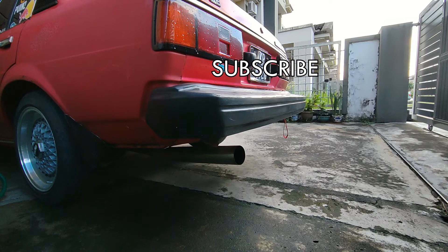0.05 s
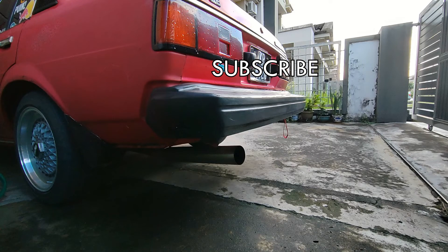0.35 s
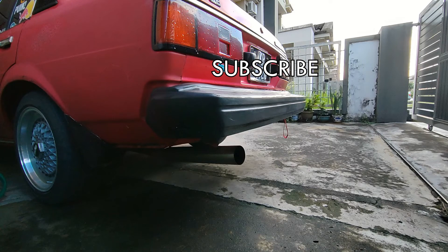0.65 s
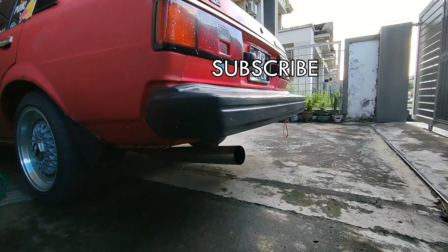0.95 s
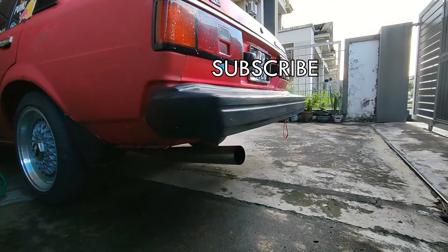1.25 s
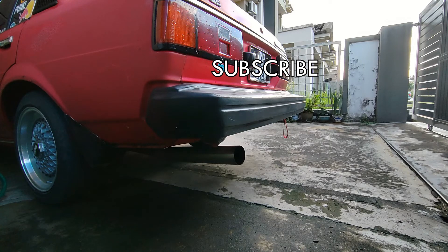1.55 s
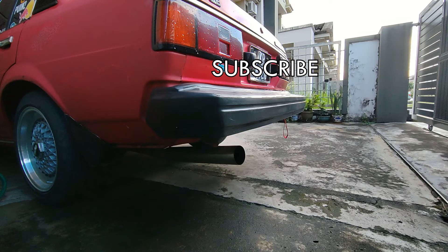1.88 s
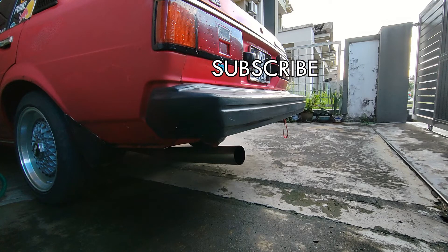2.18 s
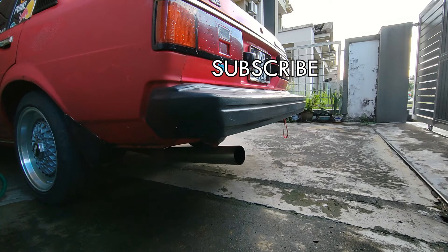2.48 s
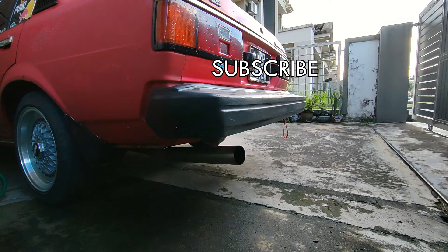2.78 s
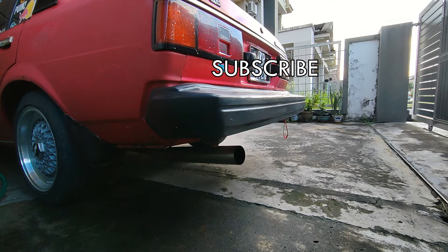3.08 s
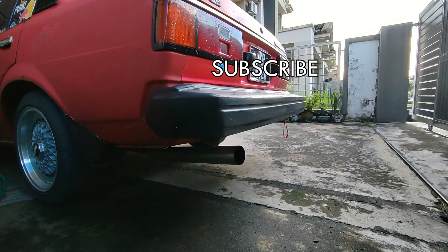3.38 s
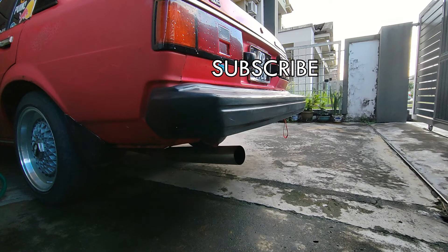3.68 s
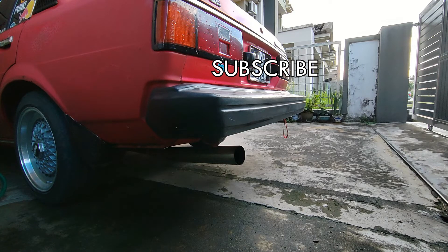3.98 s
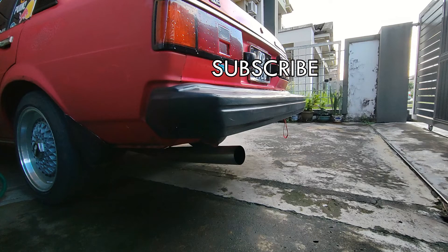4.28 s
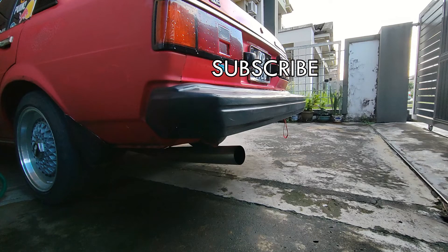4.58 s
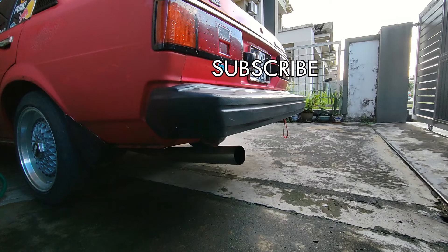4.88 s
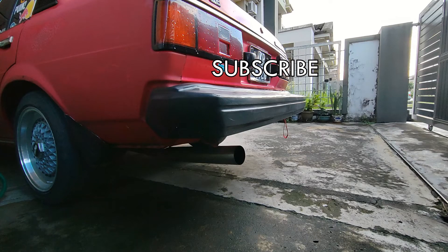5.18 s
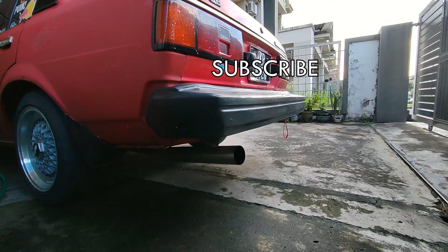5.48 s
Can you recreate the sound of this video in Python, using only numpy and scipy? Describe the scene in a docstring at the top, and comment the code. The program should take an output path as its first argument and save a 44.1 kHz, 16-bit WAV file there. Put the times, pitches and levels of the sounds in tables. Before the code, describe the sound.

A car idles close to its open tailpipe, a loud, deep exhaust drone gently swelling and sinking under a light, pulsing rasp.

```python
"""On a concrete driveway a four-cylinder car idles, heard close to its open straight pipe.
Three strong firings and a weak one a cycle drive the pipe's air column into a drone, which swells and
sinks as the idle hunts on and off resonance. Gas chuffs past the valve; then each pressure front leaves
the mouth with a crack, a bark of the tailpipe's modes and a puff of turbulent gas. The underbody and
the walls scatter this rasp, and a faint outdoor rumble lies beneath."""
import sys
import numpy as np
from scipy import signal
from scipy.fft import rfft, irfft, next_fast_len
from scipy.io import wavfile
from scipy.ndimage import uniform_filter1d

SR = 44100
rng = np.random.default_rng(int(sys.argv[2]) if len(sys.argv) > 2 else 0)


def int16_out(signal):
    """Quantize to a 16-bit WAV file."""
    q = np.round(np.clip(np.atleast_2d(signal).T, -1, 1) * 32767)
    wavfile.write(sys.argv[1], SR, q.astype(np.int16))


N = 248724
LEAD = SR // 2  # samples of padding before the scene, and at least as many after
SIZE = next_fast_len(N + 2 * LEAD)
TIME = (np.arange(SIZE) - LEAD) / SR
HZ = np.maximum(np.fft.rfftfreq(SIZE, 1 / SR), 1e-3)
RESONANT_RPM = 1382  # the speed at which the firings meet the pipe's resonances

# The hunting idle. Each row: time in seconds, crank speed in rpm.
IDLE_SPEED = [(0.0, 1379.5), (0.92, 1394.6), (1.14, 1382.2), (1.43, 1393.1), (1.8, 1362.2), (2.4, 1432.8),
              (2.74, 1441.3), (3.05, 1381.4), (3.45, 1384.4), (3.56, 1371.4), (4.4, 1382.7), (4.87, 1437.8),
              (5.18, 1417.1), (5.64, 1415.6)]
# The cylinders in firing order. Each row: push in dB, valve timing offset in seconds,
# crack in dB, gas in dB, chuff in dB; levels compare one cylinder with another.
CYLINDERS = [(2, -.0013, 8.5, 3, -26), (2.7, -.0004, 15, -2, -18), (2, -.0006, 4.5, 1.5, 3.5),
             (0.5, -.0027, -10, -43, 2)]
# Modes of the exhaust's air column. Each row: frequency in Hz, bandwidth in Hz, gain in dB, polarity.
AIR_COLUMN_MODES = [(69.48, 5.27, 26.5, -1), (73.53, 7.42, 21, 1), (140.7, 44.4, 15, 1),
                    (148.84, 15.84, 16, -1), (173.2, 7.2, 18, -1), (197.5, 1.88, 10, -1),
                    (217.92, 8.05, 15.5, -1), (268, 4.1, 8.5, -1), (324.6, 4, -1.5, 1),
                    (380.4, 21, -9.5, 1), (422.2, 8.6, -5, 1), (477, 14.4, -4, -1), (527.4, 6, -7.5, 1),
                    (552.7, 22.6, -9, -1)]
# Single loud pops. Each row: time in seconds, crack and bark in dB relative to the cylinder's usual.
LOUD_POPS = [(0.123, 3, 6.5), (0.21, -0.5, 5.5), (0.315, 15, 14.5), (0.383, 4.5, 6.5), (0.965, 11.5, 9),
             (1.073, 4.5, 6.5), (1.943, -4.5, 4.5), (2.286, 2.5, 4), (2.872, 7, 1), (3.304, 1.5, 9),
             (3.74, -10, 7), (3.827, -4, 8.5), (4.35, 4, 3), (4.84, 9, 8), (5.008, 6.5, 6)]
# Short-lived upper modes of the tailpipe. Each row: frequency in Hz, bandwidth in Hz, gain in dB.
TAILPIPE_MODES = [(444, 54, 2), (645, 34, 4.5), (741.4, 19, 2.5), (854.6, 43, 1.5), (955, 41, -0.5),
                  (1210, 39, -3)]
# Broad spectral envelope of the rasp. Each row: frequency in Hz, gain in dB.
RASP_COLOUR = [(200, -20.5), (400, 4), (540, 4), (660, 8), (1000, -1), (1450, -14.5), (2080, -9.5),
               (2600, -10), (3700, -10), (4400, -12.5), (7500, -11), (9500, -21.5), (11500, -27.5),
               (15000, -52)]
# Resonances of the pipe's mouth and wall. Each row: frequency in Hz, bandwidth in Hz, boost in dB.
MOUTH_RINGS = [(1269, 29, 13), (1660, 200, 15.5), (2384, 366, 8), (2700, 170, 9), (3458, 130, 9),
               (3870, 145, 7.5), (7200, 560, 2.5), (11030, 730, 5)]
# Level difference between the ears. Each row: frequency in Hz, left minus right in dB.
EAR_BALANCE = [(60, 0.5), (110, -2), (200, -1.84), (380, 0.6), (700, -1.5), (1300, 0), (4400, -2),
               (15000, -7.5)]
# Sound arriving from the sides. Each row: frequency in Hz, level in dB relative to the direct sound.
LATERAL_SOUND = [(60, -56), (250, -16.5), (400, -24), (520, 1.5), (700, -5.5), (1200, -10), (2000, -7.5),
                 (3500, -6.5), (7000, -6.5), (15000, 2.5)]


def undb(db):
    """Amplitude ratio of a level in decibels."""
    return 10 ** (np.asarray(db) / 20)


def unit(x):
    """Normalisation to rms 1 over the length of the scene."""
    return x / np.sqrt(np.mean(x[..., LEAD:LEAD + N] ** 2))


def through(x, response):
    """Linear filtering: the spectrum is multiplied by a frequency response."""
    return irfft(rfft(x) * response, SIZE)


def spectrum(points):
    """Interpolation of (Hz, dB) points on a log-frequency axis."""
    hz, db = np.transpose(points)
    return np.interp(np.log(HZ), np.log(np.maximum(hz, 1)), db)


def minimum_phase(db):
    """Folding the cepstrum gives a causal response with the given dB curve."""
    cepstrum = irfft(np.log(undb(db)), SIZE)
    cepstrum[1:SIZE // 2] *= 2
    cepstrum[SIZE // 2 + 1:] = 0
    return np.exp(rfft(cepstrum))


def resonance(hz, width_hz):
    """Band-pass response of a damped oscillator, gain 1 at the centre."""
    return 1 / (1 + 1j * (HZ / hz - hz / HZ) * hz / width_hz)


def decay(t60):
    """Exponential decay by 60 dB in t60 seconds."""
    return undb(-np.minimum(60 * np.arange(SIZE) / SR / t60, 300))


def pulses(times, db, scatter_db=0):
    """Impulse train whose levels may scatter normally about the given ones."""
    if scatter_db:
        db = db + scatter_db * rng.standard_normal(len(times))
    samples = np.clip(np.round(times * SR).astype(int) + LEAD, 0, SIZE - 1)
    return np.bincount(samples, undb(db), SIZE)


def turbulence(impulses, envelope):
    """Amplitude modulation: each impulse releases white noise under the envelope."""
    return through(impulses, rfft(envelope)) * rng.standard_normal(SIZE)


def crank_rpm(times):
    """Engine speed by linear interpolation of the idle."""
    return np.interp(times, *np.transpose(IDLE_SPEED))


def firings(jitter_s=0.00018, first_firing_cycles=0.1575):
    """The four-stroke cycle fires four cylinders in two turns; gives each firing's time and levels."""
    count = np.cumsum(crank_rpm(TIME)) / SR / 30  # rpm / 30 is firings per second
    count -= count[LEAD] + 4 * first_firing_cycles
    number = np.arange(np.ceil(count[0]) + 1, count[LEAD + N] + 2).astype(int)
    push_db, valve_s, crack_db, gas_db, chuff_db = np.array(CYLINDERS)[number % len(CYLINDERS)].T
    times = np.interp(number, count, TIME) + valve_s + jitter_s * rng.standard_normal(len(number))
    return times, push_db, crack_db, gas_db, chuff_db


def drone(times, push_db, eddy_db=-15, eddy_low_hz=110, eddy_high_hz=600, low_hz=36):
    """Standing waves: firings and eddies in the flow excite the air column. Held near rms 1."""
    push = pulses(times, push_db, scatter_db=1.5)
    eddies = unit(turbulence(push, decay(t60=0.13)))
    eddies = through(eddies, 1 / (1 + (eddy_low_hz / HZ) ** 2) / (1 + 1j * HZ / eddy_high_hz))
    column = sum(np.sign(polarity) * undb(db) * resonance(hz, width)
                 for hz, width, db, polarity in AIR_COLUMN_MODES)
    radiation = 1 / (1 + (low_hz / HZ) ** 6)  # the mouth radiates the longest waves poorly
    sound = through(unit(push) + undb(eddy_db) * eddies, column * radiation)
    power = uniform_filter1d(sound ** 2, size=15200, mode="wrap")
    return sound / np.sqrt(power + 1e-9)


def boom(peak_db=-10, half_width_rpm=47.2):
    """Forced resonance: the drone's level in dB falls on either side of the resonant speed."""
    detuning = (crank_rpm(TIME) - RESONANT_RPM) / half_width_rpm
    return peak_db - 10 * np.log10(1 + detuning ** 2)


def chuff(times, chuff_db, lead_s=0.0054):
    """Flow noise: gas slips past the opening valve just ahead of the front, with a hollow sound."""
    openings = pulses(times - lead_s, chuff_db, scatter_db=2)
    flow = turbulence(openings, decay(t60=0.06))
    return unit(through(flow, resonance(hz=1050, width_hz=800) ** 2))


def uneven_burning(times, crack_spread_db=3, bark_spread_db=3.5, labour_db=2.1, db_per_rpm=0.09):
    """Combustion varies from cycle to cycle: extra dB of crack and bark, with a few loud pops."""
    crack_luck, bark_luck = (2 * rng.random((len(times), 2)) - 1).T
    crack_db = crack_spread_db * crack_luck
    # the slower the engine turns, the harder the charges bark
    bark_db = bark_spread_db * bark_luck + labour_db + db_per_rpm * (RESONANT_RPM - crank_rpm(times))
    for time, pop_crack_db, pop_bark_db in LOUD_POPS:
        nearest = np.argmin(abs(times - time))
        crack_db[nearest], bark_db[nearest] = pop_crack_db, pop_bark_db
    return crack_db, bark_db


def cracks(times, crack_db, low_hz=520, tear_db=-1):
    """Nonlinear steepening makes each front a sharp edge, which tears into a crackle at the lip."""
    edge = unit(pulses(times, crack_db))
    tear = unit(turbulence(edge, decay(t60=0.021)))
    high_pass = 1 / (1 + low_hz / (1j * HZ)) ** 2
    return unit(through(undb(tear_db) * tear - edge, high_pass))


def bark(times, bark_db, breakup_db=-8):
    """Impulse excitation: the front and its brief break-up ring the tailpipe's upper modes."""
    front = unit(pulses(times, bark_db))
    breakup = unit(turbulence(front, decay(t60=0.028)))
    modes = sum(undb(db) * resonance(hz, width) for hz, width, db in TAILPIPE_MODES)
    return unit(through(undb(breakup_db) * breakup - front, modes * resonance(hz=700, width_hz=1700)))


def gas_puffs(times, gas_db, outflow_db=-9, span_hz=(700, 12000), bands=12):
    """Turbulence hisses at each front and dies with the outflow; each puff has its own colour."""
    puff = decay(t60=0.039) + undb(outflow_db) * decay(t60=0.22)
    band_position = np.interp(np.log(HZ), np.log(span_hz), [0, bands - 1])
    hiss = 0
    for band in range(bands):
        flow = turbulence(pulses(times, gas_db, scatter_db=4), puff)
        band_gain = np.sqrt(np.maximum(1 - abs(band_position - band), 0))
        hiss = hiss + rfft(flow) * band_gain
    return unit(irfft(hiss, SIZE))


def mouth():
    """Response of the pipe's mouth and wall: resonance peaks on a broad spectral envelope."""
    rings_db = sum(db * abs(resonance(hz, width)) ** 2 for hz, width, db in MOUTH_RINGS)
    return minimum_phase(spectrum(RASP_COLOUR) + rings_db)


def reflections(direct, near_db=-7, near_t60=0.047, far_db=-11, far_t60=0.33):
    """Diffuse reflection from underbody and walls smears a sound in time but keeps its broad colour."""
    near, far = (rng.standard_normal(SIZE) * decay(t60) for t60 in (near_t60, far_t60))
    tail = undb(near_db) * near / np.linalg.norm(near) + undb(far_db) * far / np.linalg.norm(far)
    response = direct + rfft(tail)
    return response / np.sqrt(uniform_filter1d(abs(response) ** 2, size=700))


def rasp(times, crack_db, gas_db, chuff_db, travel_s=0.0016, gas_share=0.5):
    """Source and filter: cracks, gas and engine whirr pass the mouth, then echo with chuff and bark."""
    fronts = times + travel_s
    extra_crack_db, extra_bark_db = uneven_burning(times)
    edges = undb(-2.5) * cracks(fronts, crack_db + extra_crack_db)
    hiss = undb(-0.5) * gas_puffs(fronts, gas_db + gas_share * extra_crack_db)
    whirr = undb(-15) * rng.standard_normal(SIZE)
    bright = unit(through(edges + hiss + whirr, mouth()))
    body = undb(-8) * chuff(times, chuff_db) + undb(-0.5) * bark(fronts, crack_db + extra_bark_db)
    return through(bright + body, reflections(direct=0.67))


def jet(times, gas_db, travel_s=0.0025, low_hz=3200):
    """Jet noise: the flow breaks up beyond the mouth, and its high hiss differs at each ear."""
    colour = mouth() / (1 + low_hz / (1j * HZ))
    return np.array([unit(through(gas_puffs(times + travel_s, gas_db), colour)) for _ in range(2)])


def outdoor_rumble():
    """Ambient noise, confined to a band at the lower limit of hearing."""
    return unit(through(rng.standard_normal(SIZE), resonance(hz=22, width_hz=30) ** 2))


def ears(sound, left_lag_s=0.00004):
    """Interaural time and level differences set a sound slightly right; lateral echoes widen it."""
    balance_db = spectrum(EAR_BALANCE) / 2
    scattered = reflections(direct=0, near_db=-1, near_t60=0.022, far_db=-11.5, far_t60=0.021)
    side = undb(spectrum(LATERAL_SOUND)) * scattered
    left = undb(balance_db) * (1 + side) * np.exp(-2j * np.pi * HZ * left_lag_s)
    right = undb(-balance_db) * (1 - side)
    return through(sound, np.array([left, right]))


def scene(rasp_db=-36.5, rasp_share=0.19, jet_db=-47, rumble_db=-54):
    """Superposition of the drone, rasp and jet of the same firings over a faint outdoor rumble."""
    times, push_db, crack_db, gas_db, chuff_db = firings()
    boom_db = boom()
    car = undb(boom_db) * drone(times, push_db)
    # the pipe rasps a little more when it resonates strongly
    swell_db = rasp_share * (boom_db - boom_db.mean())
    car += undb(rasp_db + swell_db) * rasp(times, crack_db, gas_db, chuff_db)
    stereo = ears(car + undb(rumble_db) * outdoor_rumble())
    stereo += undb(jet_db) * jet(times, gas_db)
    return stereo[:, LEAD:LEAD + N]


def record(dry, top_hz=15600):
    """Soft saturation rounds the peaks near full scale, and a steep low-pass cuts the top."""
    rounded = dry / (1 + abs(dry) ** 10) ** (1 / 10)
    return signal.sosfilt(signal.ellip(8, 0.2, 70, top_hz, fs=SR, output="sos"), rounded)


dry = scene()
out = record(dry)
int16_out(out)
```